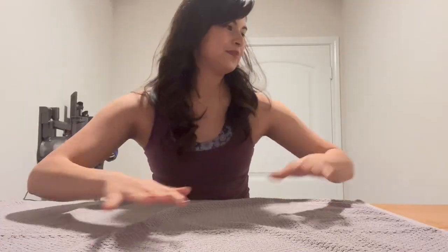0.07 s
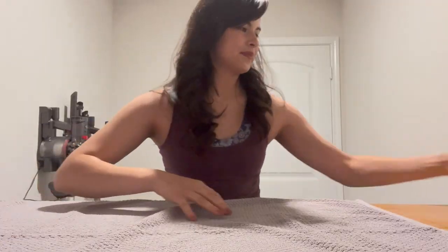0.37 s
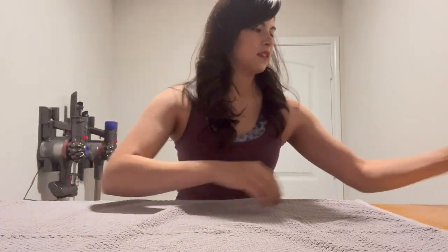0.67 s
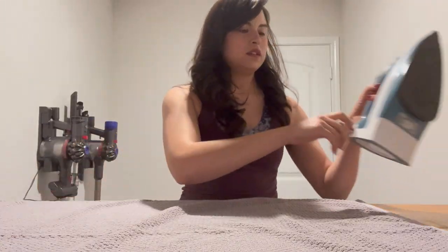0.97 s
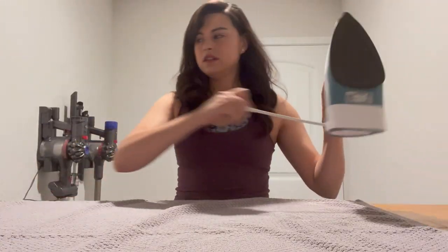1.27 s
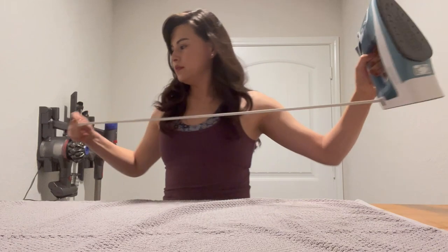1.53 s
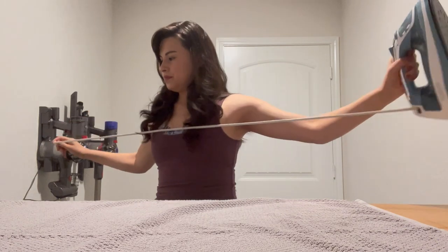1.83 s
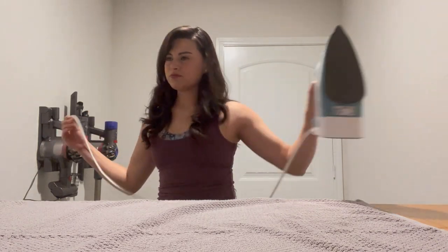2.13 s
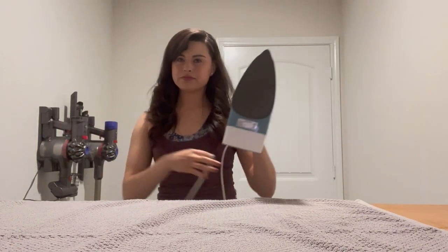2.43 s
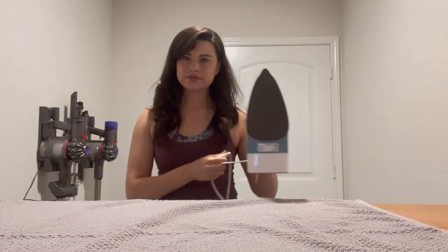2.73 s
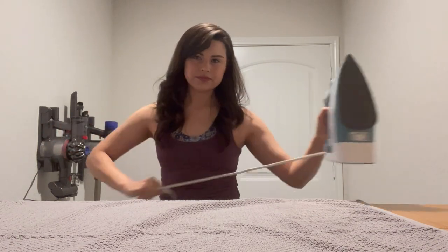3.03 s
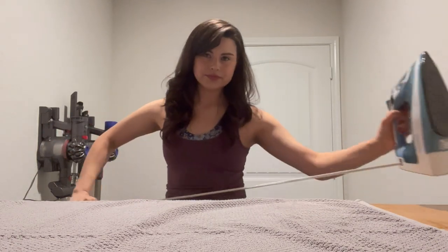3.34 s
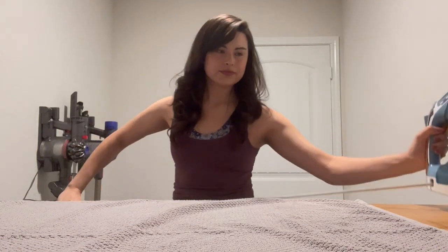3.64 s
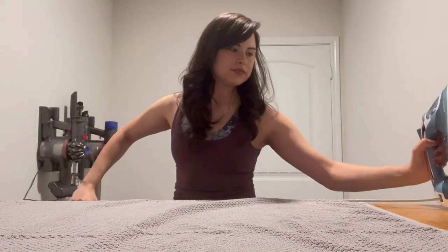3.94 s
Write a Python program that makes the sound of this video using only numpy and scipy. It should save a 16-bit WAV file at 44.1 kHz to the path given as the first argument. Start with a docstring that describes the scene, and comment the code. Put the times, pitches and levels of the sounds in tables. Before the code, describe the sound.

Rapid clicking and rasping as a clothes iron's retractable cord is pulled out twice.

```python
"""A small bare room: the cord is drawn out of a clothes iron's spring reel in two long pulls.
A pawl snaps over the ratchet inside the hollow plastic housing, speeding up and slowing down,
and locks with a clack after each pull. The cord rasps and ticks through its slot.
Hands rustle, tap and knock on the iron. The taut cord thrums against the table in the second pull,
the table takes a few soft bumps, and a low room hum lies under it all."""
import sys
import numpy as np
from scipy import signal
from scipy.fft import rfft, irfft
from scipy.io import wavfile

SR = 44100
rng = np.random.default_rng(int(sys.argv[2]) if len(sys.argv) > 2 else 0)


def bounce(signal):
    """Save signal as a 16-bit WAV file at the path given by the first command-line argument."""
    frames = np.transpose(np.atleast_2d(signal))
    limited = np.clip(frames, -1, 1)
    pcm = np.round(limited * 32767).astype(np.int16)
    wavfile.write(sys.argv[1], SR, pcm)


N = 176400
TIME = np.arange(N) / SR

# the pawl drops off a tooth: t/s, level/dB, treble/dB
PAWL_DROPS = [(1.1754,-16,-2.5),(1.2247,-17.5,0.5),(1.257,-20,2.5),(1.284,-16,0.5),(1.310,-16,-4),(1.336,-14.5,-5.5),(1.360,-19,0),(1.384,-16.5,-2.5),
              (1.409,-16.5,-3),(1.432,-21,5),(1.454,-17,-1),(1.474,-16,-6),(1.493,-18,1.5),(1.514,-17,-8.5),(1.533,-16.5,1),(1.552,-17,-4.5),
              (1.572,-17.5,0.5),(1.596,-19,2.5),(1.621,-16,-5),(1.649,-14.5,-3),(1.682,-17,-1.5),(1.752,-18,-0.5),
              (2.785,-17.5,-2),(2.836,-16.5,-1),(2.880,-16.5,-4.5),(2.909,-16.5,-3.5),(2.936,-16.5,-4),(2.961,-17,-3.5),(2.983,-15,-6),(3.006,-15.5,-4),
              (3.028,-20,0),(3.051,-17.5,-1.5),(3.075,-15.5,-5.5),(3.100,-19,-1.5),(3.127,-19.5,2),(3.158,-18,-0.5),(3.196,-18.5,-1.5),(3.243,-19.5,0.5),
              (3.290,-18,0.5),(3.3366,-16.5,-1),(3.385,-17.5,-4.5),(3.431,-19,-2.5),(3.518,-24,-2)]
# tone of the pawl (every EQ shapes tone only, at unit power): f/Hz, level/dB
PAWL_EQ = [(60,-38),(140,-18),(200,-19),(290,-2),(400,-3),(540,-4),(800,-2.5),(1350,-2),(1700,-2.5),(2050,-8.5),(2600,-8.5),(3600,-11.5),(5300,-14),(6800,-13),(8200,-10.5),(10500,-20.5),(13000,-20),(16000,-22.5)]
# steady resonances of the housing and its surroundings: f/Hz, width/Hz, left/dB, right/dB
HOUSING_PEAKS = [(318,43,-2,-3.5),(419,36,-5,8),(682,67,2,9.5),(846,30,5.5,2.5),(824,17,-6.5,1.5),(1240.5,100,-1,4.5),(1396,21,1,4.5),(1600,23,5,2),(6480,900,6.5,3.5)]
# long-ringing housing modes: f/Hz, left/dB, right/dB, t60/s
RING_MODES = [(393.7,-26.5,-15,0.26),(689,-29.5,-14,0.16),(860,-25,-19.5,0.19),(1340,-30,-27,0.18)]
# moving resonances of the housing's shell, cavity and deep hollow: t/s, f/Hz, boost/dB
SHELL_SWEEP = [(1.18,1280,-4),(1.29,1410,8.5),(1.36,1420,7.5),(1.431,1570,8.5),(1.52,1380,-3),(1.579,1170,-0.5),(1.65,1160,2),(1.78,1300,-1),
               (2.79,1180,5),(2.91,1170,4),(3.0,1390,6),(3.04,1280,0.5),(3.08,1050,6),(3.16,960,4.5),(3.25,1080,3.5),(3.5,990,-0.5)]
CAVITY_SWEEP = [(1.18,700,3),(1.35,700,-5),(1.53,630,-1),(1.7,720,-0.5),(2.8,720,7.5),(2.96,680,-6),(3.1,680,1),(3.25,650,10),(3.34,700,-1),(3.52,765,-1)]
HOLLOW_SWEEP = [(1.18,364,5.5),(1.43,385,1),(1.51,410,7),(1.59,404,3),(1.66,405,8.5),(1.8,398,-0.5),(2.8,370,6),(3.0,382,-1),(3.101,400,5),(3.4,430,3)]

# the pawl catches and the reel rocks against it: t/s, level/dB, treble/dB, thud/dB
LOCK_HITS = [(1.9164,-20.5,9,-25),(1.928,-21.5,5,-22),(1.950,-25.5,-1,-30),(2.022,-38,-11,-45),(3.684,-22,-9,-22.5),(3.697,-26.5,-8,-28),(3.722,-33.5,-8,-34)]
# boxy tone of the clack: f/Hz, level/dB
LOCK_EQ = [(60,-33),(170,-20),(250,0.5),(400,-0.5),(850,2),(1300,-2),(1700,-8.5),(2400,-13),(3200,-20),(5000,-23.5),(8500,-22.5),(12000,-32),(16000,-33)]
# low modes of the jolted body: f/Hz, level/dB, t60/s
BODY_MODES = [(289,-11.5,.11),(400.5,-3.5,.13),(584,-1,0.049),(774,-5.5,0.057),(1012,-10,.04)]

# envelope of the cord running through its slot: t/s, level/dB
RASP_ENVELOPE = [(1.17,-58),(1.2,-34),(1.3,-30),(1.55,-27.5),(1.68,-32),(1.73,-43),(1.85,-70),(2.75,-84.5),(2.82,-40),(2.98,-30),(3.15,-35.5),(3.4,-38),(3.6,-58)]
# the cord flicks the rim of the slot: t/s, level/dB
FLICK_HITS = [(0.5334,-39),(0.934,-48),(1.178,-23.5),(1.753,-21),(2.681,-48),(2.787,-23),(2.839,-22),(2.912,-18),(3.051,-15.5),(3.161,-16),(3.431,-23)]
# the cord scrapes taut before a pull: t/s, length/s, level/dB
SCRAPE_STROKES = [(1.15,0.036,-36),(2.635,0.3,-49.5),(2.715,0.04,-39.5)]
# gritty rasp, thin flick and midrange scrape: f/Hz, level/dB
RASP_EQ = [(200,-23),(600,-8),(1200,-3),(2400,2),(3400,3.5),(5000,-4),(7000,-2.5),(8800,0),(10500,-24.5),(13000,-17),(14500,-4),(16000,-15.5)]
FLICK_EQ = [(200,-33.5),(2000,-20.5),(5000,-7),(7000,2.5),(10500,8.5),(13500,0),(16000,-20.5)]
SCRAPE_EQ = [(200,-21),(600,-3),(1150,6),(1700,2.5),(2800,-14),(5000,-27),(16000,-34.5)]
# modes of the taut cord: f/Hz, level/dB
CORD_MODES = [(53.5,-38),(42.3,-40.5),(100,-63)]

# fingers and plug tap the housing: t/s, level/dB, treble/dB
TAP_HITS = [(.4333,-64,8.5),(.528,-50.5,13),(.534,-46,5),(.711,-44,-4),(.741,-49,2.5),(.934,-45.5,-7.5),(1.015,-52.5,-17),(1.112,-46,-7),(1.160,-48.5,2),
            (2.205,-52,1.5),(2.378,-53,6.5),(2.463,-50.5,-6.5),(2.494,-49,-19),(2.639,-48,-26.5),(2.7035,-40,-25),(2.7284,-41.5,-21)]
# hollow knocks on the iron's body: t/s, f/Hz, level/dB
KNOCK_HITS = [(0.441,205,-52),(0.473,134,-48),(.495,222,-53),(0.56,210,-52.5),(.66,261,-53),(0.934,947,-38),(1.211,232,-32.5),(1.235,147.6,-38),(1.778,146,-36.5),(1.921,217,-33),(2.065,378,-44),(2.124,331,-50),(2.376,266,-41.5),(2.664,340,-43),(2.70,367,-41)]
# envelope of sliding hand and cord: t/s, level/dB
RUSTLE_ENVELOPE = [(.36,-105),(.41,-71),(.45,-65.5),(.62,-46),(.69,-60),(.77,-53.5),(.90,-44),(1.0,-51),(1.08,-62),(1.17,-37),(1.9,-51),(2.15,-54),(2.35,-61.5),(2.52,-68.5),(2.61,-68),(2.66,-49),(2.76,-40),(3.6,-42),(3.82,-63),(4.0,-57.5)]
# cord sleeve and fingers brush the housing: t/s, length/s, level/dB
BRUSH_STROKES = [(0.553,0.058,-75),(.72,0.042,-62.5),(0.825,0.16,-60),(2.364,0.071,-56.5)]
# round tap, dull rustle and airy brush: f/Hz, level/dB
TAP_EQ = [(60,-16.5),(180,-5.5),(280,4),(500,3),(1100,-0.5),(2000,-8),(4000,-23),(8000,-13.5),(11000,-19.5),(16000,-23)]
RUSTLE_EQ = [(60,-7),(170,-10),(300,0.5),(600,2),(1200,0.5),(2000,-11),(4000,-16),(8000,-29.5),(16000,-31.5)]
BRUSH_EQ = [(200,-20),(1200,-5.5),(2300,0),(3800,-0.5),(5500,6),(7500,6),(11000,-11.5),(16000,-17.5)]

# soft bumps through the table: t/s, level/dB
BUMP_HITS = [(0.469,-42),(0.556,-43),(.585,-38),(.625,-40.5),(3.785,-25),(3.797,-23),(3.832,-27.5),(3.859,-31.5),(3.895,-40),(3.94,-34)]
# bass-heavy table rumble and room hum: f/Hz, level/dB
RUMBLE_EQ = [(20,-32),(45,-7.5),(70,3.5),(95,0),(125,-1),(190,-12.5),(300,-22.5),(700,-56),(3000,-84)]
HUM_EQ = [(20,-27),(38,-10.5),(55,-1),(120,-6),(170,-14.5),(230,-7),(350,-21.5),(550,-47),(1500,-57.5),(6000,-49),(16000,-51)]
# decay of the room: f/Hz, t60/s
REVERB_DECAY = [(150,0.18),(500,0.61),(1300,0.4827),(3500,0.3),(9000,0.4634),(15000,0.05)]
# reverb balance, before each source's own room_db send: f/Hz, level/dB
REVERB_LEVEL = [(150,2.4),(500,2.75),(1300,6.47),(3500,6.426),(9000,2.2),(15000,0.39)]
# stereo image: f/Hz, left-right correlation
STEREO_CORRELATION = [(60,0.83),(140,.85),(300,0.47),(600,0),(3000,0),(5000,0.64),(7500,0.55),(10000,1),(12500,1),(15000,0.91)]


def ratchet():
    """Pawl and cord sound through the housing, whose resonances shift as the reel empties and the iron turns."""
    clicks = impacts(PAWL_DROPS, PAWL_EQ, HOUSING_PEAKS, room_db=-1.0, path_count=7)
    sound = clicks + housing_ring() + cord_rasp()
    sound = swept_peak(sound, SHELL_SWEEP, width_hz=100)
    sound = swept_peak(sound, CAVITY_SWEEP, width_hz=44)
    return swept_peak(sound, HOLLOW_SWEEP, width_hz=45)


def housing_ring():
    """Every pawl drop rings each housing mode with a strength of its own."""
    starts, db, _ = np.transpose(PAWL_DROPS)
    out = np.zeros((2, N))
    for hz, left_db, right_db, t60 in RING_MODES:
        kicks = np.full(N, 1e-18)
        strength = from_db(db) * rng.uniform(.5, 1, len(starts))
        kicks[(starts * SR).astype(int)] = strength * rng.choice([-1, 1], len(starts))
        decay, angle = from_db(-60 / (t60 * SR)), 2 * np.pi * hz / SR
        ring = signal.lfilter([0, np.sin(angle)], [1, -2 * decay * np.cos(angle), decay * decay], kicks)
        out += from_db([[left_db], [right_db]]) * ring
    return out


def reel_lock(attack_s=0.0011):
    """The pawl catches with a clack, and the weight of the stopping reel thuds through the body."""
    clacks = impacts(LOCK_HITS, LOCK_EQ, room_db=-6.5, path_count=3)
    thuds, t = np.zeros(N + SR), TIME[:SR // 4]
    ring = sum(from_db(db - 60 * t / t60) * np.sin(2 * np.pi * hz * t) for hz, db, t60 in BODY_MODES)
    ring *= np.minimum(t / attack_s, 1)
    for start, _, _, db in LOCK_HITS:
        i = int(start * SR)
        thuds[i:i + len(t)] += from_db(db) * ring
    return clacks + thuds[:N]


def cord_rasp():
    """The running cord rasps over the rim of its slot, filling the gaps between pawl drops."""
    level = from_db(np.interp(TIME, *np.transpose(RASP_ENVELOPE), left=-120, right=-120))
    return eq(reverberate(slips(per_s=1500) * level, room_db=-7.5), RASP_EQ)


def cord_flicks(t60=0.026):
    """The cord flicks the rim of its slot: thin, dry ticks."""
    out, t = np.zeros(N), np.arange(2048) / SR
    for start, db in FLICK_HITS:
        i = int(start * SR)
        tick = unit_energy(rng.standard_normal(len(t)) * from_db(-60 * t / t60))
        out[i:i + len(t)] += from_db(db) * np.sqrt(SR / 100) * tick   # energy of 10 ms of noise
    return eq(out[None], FLICK_EQ)


def cord_thrum(start_s=3.06, rise_s=0.15, end_s=3.855, fall_s=0.29):
    """The stretched cord swings in close low modes that beat."""
    age = TIME - start_s
    swell = np.clip(age / rise_s, 0, 1) * np.clip((end_s - TIME) / fall_s, 0, 1)
    return swell * sum(from_db(db) * np.sin(2 * np.pi * hz * age) for hz, db in CORD_MODES)


def rubs(strokes, curve):
    """Cord or fingers rub the plastic in short strokes that swell and fade."""
    level = sum(from_db(db) * np.sin(np.pi * np.clip((TIME - start) / length, 0, 1))
                for start, length, db in strokes)
    return eq(reverberate(level * rng.standard_normal(N)), curve)


def finger_taps():
    """Fingers and plug strike the housing lightly, with plenty of room on them."""
    return impacts(TAP_HITS, TAP_EQ, room_db=1.5, path_count=2)


def hand_rustle(grain_db=-3.5):
    """Skin and cord slide over plastic: tiny slips on a soft hiss."""
    friction = from_db(grain_db) * slips(per_s=500) + rng.standard_normal(N) / 2
    level = from_db(np.interp(TIME, *np.transpose(RUSTLE_ENVELOPE)))
    return eq(reverberate(friction * level), RUSTLE_EQ)


def body_knocks(attack_s=0.0026, t60=0.13, size=8192):
    """Each soft contact rings one mode of the body; the grip decides which."""
    out, t = np.zeros(N + size), np.arange(size) / SR
    for start, hz, db in KNOCK_HITS:
        i = int(start * SR)
        envelope = from_db(db - 60 * t / t60) * np.minimum(t / attack_s, 1)
        out[i:i + size] += envelope * np.sin(2 * np.pi * hz * t)
    return out[:N]


def table_bumps(ring_hz=86, ring_t60=0.025, rumble_t60=0.32, rumble_db=-5.5):
    """Each padded bump rocks the table top and leaves a short rumble."""
    thumps, rumble_power = np.zeros(N), np.zeros(N)
    for start, db in BUMP_HITS:
        age = np.maximum(TIME - start, 0)
        thumps += from_db(db - 60 * np.minimum(age / ring_t60, 2)) * np.sin(2 * np.pi * ring_hz * age)
        rumble_power += (age > 0) * from_db(db - 60 * np.minimum(age / rumble_t60, 2)) ** 2
    rumble = from_db(rumble_db) * np.sqrt(rumble_power) * diffuse_noise(N)
    return thumps + eq(rumble, RUMBLE_EQ)


def room_hum(level_db=-63.5):
    """A faint, steady bed of low noise."""
    return from_db(level_db) * eq(diffuse_noise(N), HUM_EQ)


def impacts(hits, curve, peaks=(), *, room_db, path_count):
    """Snaps on the moving iron reach the listener by changing paths, used round-robin."""
    paths = [impulse_response(room_db) for _ in range(path_count)]
    out = np.zeros((2, N + SR))
    for k, (start, db, treble_db, *_) in enumerate(hits):
        hit = signal.fftconvolve(snap(treble_db)[None], paths[k % path_count], axes=1)
        i = int(start * SR)
        out[:, i:i + hit.shape[1]] += from_db(db) * hit
    return eq(out[:, :N], curve, peaks)


def snap(treble_db, rebound_s=0.0045, rebound_db=-0.5,
         chatter_per_s=2500, chatter_s=0.0065, chatter_db=3, size=2048):
    """One hard contact, a single bounce and the dying buzz of loose parts."""
    t = np.arange(size) / SR
    chatter = (rng.random(size) < chatter_per_s / SR) * rng.standard_normal(size)
    force = from_db(chatter_db) * unit_energy(chatter * np.exp(-t / chatter_s))
    force[0] += 1
    bounce_at = int(rebound_s * rng.uniform(.6, 1.4) * SR)
    force[bounce_at] += from_db(rebound_db) * rng.choice([-1, 1])
    gain = np.sqrt(SR / 100 / np.sum(force ** 2))   # energy of 10 ms of noise, before the treble shelf
    dull = signal.lfilter(*signal.butter(1, 2500, fs=SR), force)
    return gain * (dull + from_db(treble_db) * (force - dull))


def slips(per_s):
    """Friction grain: random tiny slips at unit power."""
    return (rng.random(N) < per_s / SR) * rng.standard_normal(N) * np.sqrt(SR / per_s)


def impulse_response(room_db, build_s=0.0048, bands=14, size=32768):
    """Path of one click: the plastic cracks, the housing rings briefly, the room dies band by band."""
    t, hz = np.arange(size) / SR, np.arange(size // 2 + 1) * SR / size
    crack = from_db(-1.5) * unit_energy(diffuse_noise(size) * from_db(-60 * t / 0.016))
    housing = from_db(-2) * unit_energy(diffuse_noise(size) * from_db(-60 * t / 0.063))
    out = crack + housing
    spectrum, edges = rfft(diffuse_noise(size)), np.geomspace(40, SR / 2, bands + 1)
    for low, high in zip(edges, edges[1:]):
        centre = np.sqrt(low * high)
        band = irfft(spectrum * (hz >= low) * (hz < high))
        tail = unit_energy((1 - np.exp(-t / build_s)) * from_db(-60 * t / at_hz(REVERB_DECAY, centre)))
        out += from_db(room_db + at_hz(REVERB_LEVEL, centre)) * tail * band
    return out


def reverberate(mono, room_db=0):
    """Play a sound through housing and room at unit power, into stereo."""
    return signal.fftconvolve(mono[None], unit_energy(impulse_response(room_db)), axes=1)[:, :N]


def diffuse_noise(size):
    """Stereo white noise, wide in the mids, narrow in the bass and high treble."""
    mid, side = rfft(rng.standard_normal((2, size)))
    alike = at_hz(STEREO_CORRELATION, np.arange(len(mid)) * SR / size)
    return irfft(np.sqrt((1 + alike) / 2) * mid + np.sqrt((1 - alike) / 2) * side * [[1], [-1]], size)


def swept_peak(x, sweep, width_hz):
    """A resonance whose pitch and boost ride an automation curve."""
    times, hz, db = np.transpose(sweep)
    carrier = np.exp(2j * np.pi * np.cumsum(np.interp(TIME, times, hz)) / SR)
    pole = np.exp(-np.pi * width_hz / SR)
    band = 2 * np.real(carrier * signal.lfilter([1 - pole], [1, -pole], x / carrier))
    return x + (from_db(np.interp(TIME, times, db)) - 1) * band


def eq(x, curve, peaks=(), size=8192):
    """Unit-power stereo EQ from a tone curve and resonant peaks."""
    hz = np.arange(size // 2 + 1) * SR / size
    db = np.tile(at_hz(curve, hz), (2, 1))
    for centre, width, left, right in peaks:
        db = db + np.array([[left], [right]]) / (1 + (2 * (hz - centre) / width) ** 2)
    cepstrum = irfft(np.log(from_db(db)))
    fold = np.r_[1, np.full(size // 2 - 1, 2), np.zeros(size // 2)]   # minimum phase: no pre-ring
    kernel = unit_energy(irfft(np.exp(rfft(cepstrum * fold))))
    return signal.fftconvolve(x, kernel, axes=1)[:, :N]


def from_db(db):
    """Decibels to gain."""
    return np.exp(np.asarray(db) * (np.log(10) / 20))


def at_hz(curve, hz):
    """Read a curve on a log-frequency axis."""
    freqs, values = np.transpose(curve)
    return np.interp(np.log(np.maximum(hz, 1)), np.log(freqs), values)


def unit_energy(x):
    """Scale to an average energy of one per channel."""
    return x / np.sqrt(np.mean(np.sum(x ** 2, axis=-1)) + 1e-20)


def scene():
    """The reel up front, handling and table behind it, room hum underneath."""
    reel = ratchet() + reel_lock() + cord_flicks() + cord_thrum()
    handling = finger_taps() + hand_rustle() + body_knocks()
    brushes = rubs(BRUSH_STROKES, BRUSH_EQ)
    scrapes = rubs(SCRAPE_STROKES, SCRAPE_EQ)
    return reel + handling + brushes + scrapes + table_bumps() + room_hum()


def record(dry, lag_samples=2, cutoff_hz=16200):
    """The right channel arrives a touch late; a steep low-pass trims the top."""
    late_right = np.r_[np.zeros(lag_samples), dry[1, :-lag_samples]]
    lowpass = signal.ellip(10, .2, 80, cutoff_hz, fs=SR, output="sos")
    return signal.sosfilt(lowpass, np.array([dry[0], late_right]))


dry = scene()
out = record(dry)
bounce(out)
```